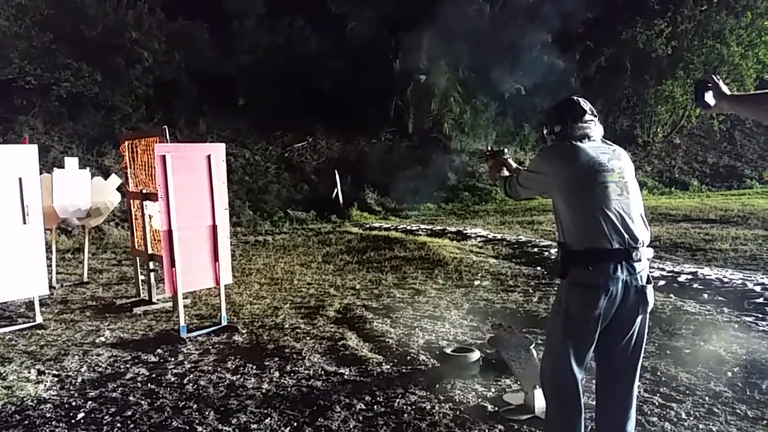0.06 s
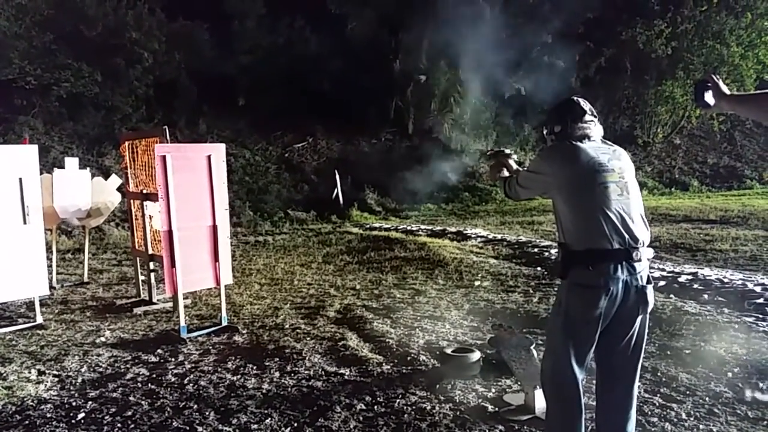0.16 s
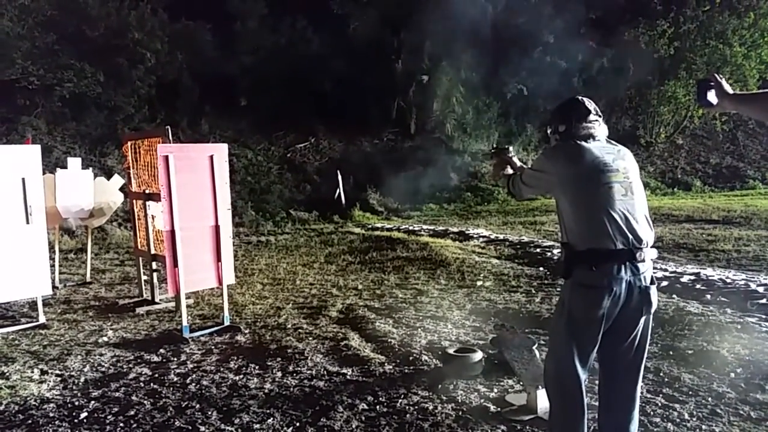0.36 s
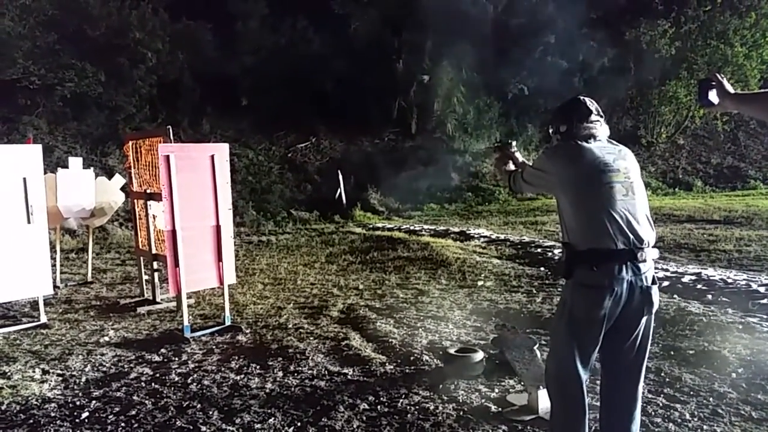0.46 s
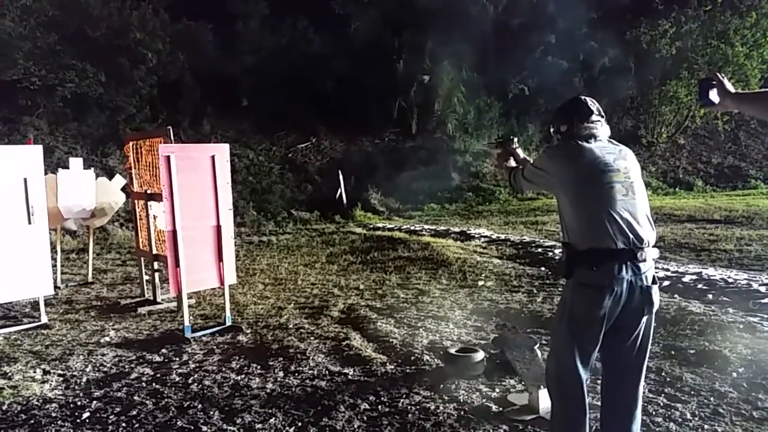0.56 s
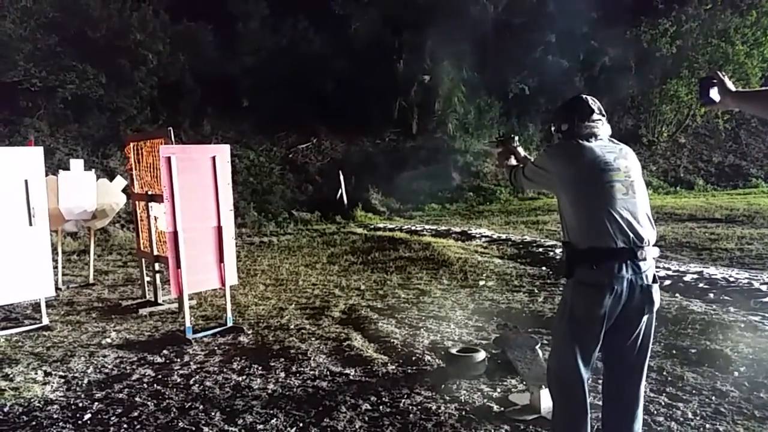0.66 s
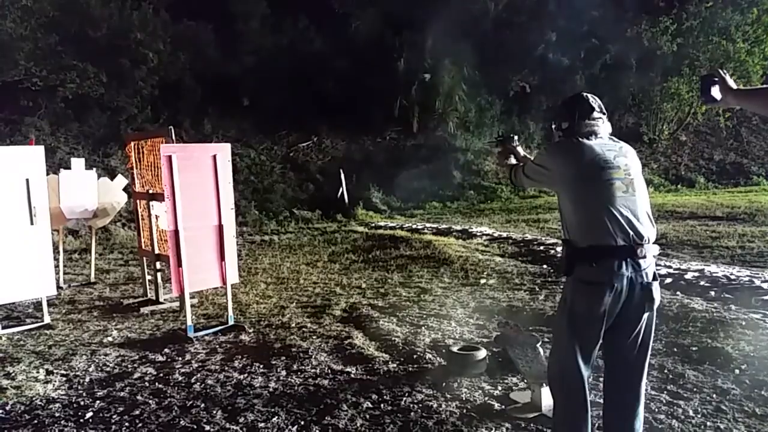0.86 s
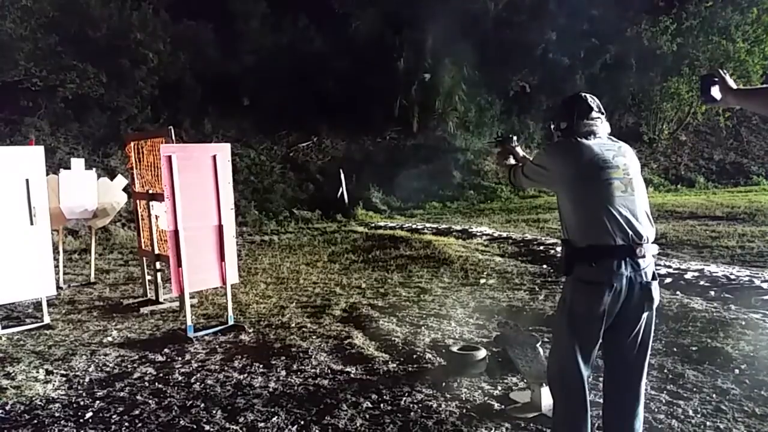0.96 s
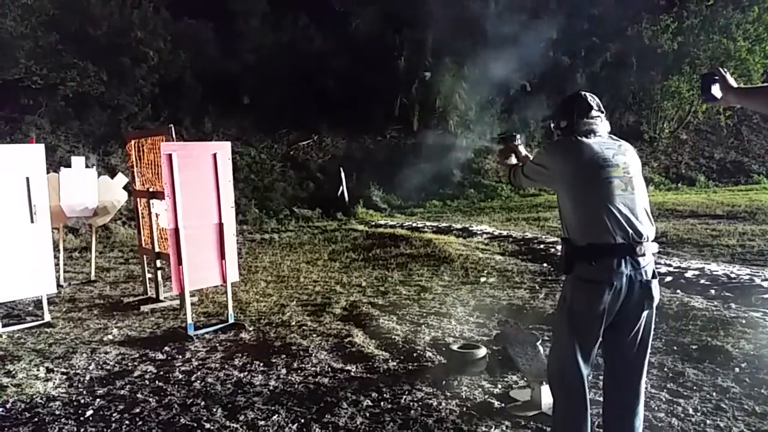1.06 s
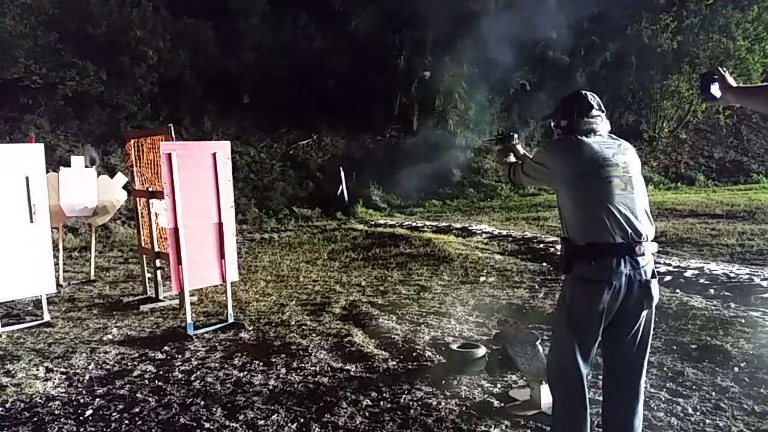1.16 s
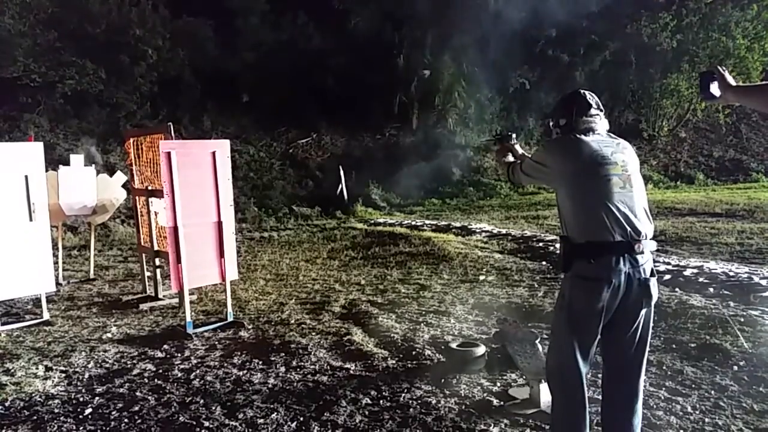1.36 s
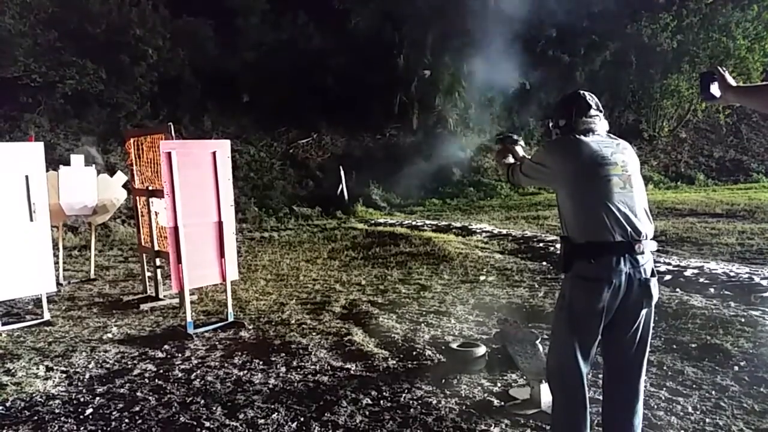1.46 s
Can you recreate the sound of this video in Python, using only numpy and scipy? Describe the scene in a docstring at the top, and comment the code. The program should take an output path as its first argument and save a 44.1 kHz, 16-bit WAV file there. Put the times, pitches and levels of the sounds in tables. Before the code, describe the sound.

A handgun fires two loud, clipped shots nearly a second apart outdoors, after the fading tail of an earlier shot. Quick slapback and a distant echo follow; close stereo microphones overload, brighter on the left.

```python
"""Handgun shots on an outdoor range

A handgun fires on an outdoor range; one shot fell just before the start, and its tail opens the scene.
Each blast, three noise bursts with a ring and a low thump, overloads two microphones. Shaped noise then
returns from nearby boards, the ground, an earth bank, the trees and a far wall with a long tail, with
short rings as slaps and clacks. Small metallic ticks, perhaps spent cases, ring as damped sines over
quiet air of coloured noise. The left side is bright, the right dull."""
import sys
import numpy as np
from scipy import signal
from scipy.fft import rfft, irfft
from scipy.io import wavfile
from scipy.ndimage import uniform_filter1d

SR = 44100
rng = np.random.default_rng(int(sys.argv[2]) if len(sys.argv) > 2 else 0)


def int16_out(signal):
    """Quantize to a 16-bit WAV file."""
    q = np.round(np.clip(np.atleast_2d(signal).T, -1, 1) * 32767)
    wavfile.write(sys.argv[1], SR, q.astype(np.int16))


N = 66150  # samples, 1.5 s

# spectra of the blast (NEAR), the reflecting surfaces and the long tail (FAR), named in the groups of
# noise: one [level/dB] per colour frequency
NEAR = (-13.5, 6, 7.6, 6.5, 10.3, 5, 6.7, 11.5, 11.5)
BOARDS = (-17, 3, -1.5, -2.7, 10.7, -5, 3.5, 4, 11.5)
GROUND = (-22, -5, -3, -3.5, 5, -4, 2, 8, 10)
BANK = (-10, -3, -3.5, -3.4, 3.1, -3.7, 6, 9.5, 14)
TREES = (-5, 2.3, 2.5, 1.5, 1.5, -5.5, -4.5, 6.5, 4.1)
WALL = (-4.5, 7, -3, -3, 5.8, -6.4, -8.3, 8.5, -1)
FAR = (2.1, 5.5, -15.5, -6.5, 8, -5.2, -4.5, -8, -12)


def gain_of(db):
    """Decibel law: amplitude ratio of a level in dB."""
    return 10 ** (np.asarray(db) / 20)


def read(points, hz):
    """Interpolation on a log-frequency axis, linear in the tabled value."""
    f, value = np.transpose(points)
    return np.interp(np.log(hz + 1), np.log(f + 1), value)


def add(mix, s, sound):
    """Superposition: sums a sound in at time s, which may lie before the start."""
    at = round(s * SR)
    part = mix[:, max(at, 0):][:, :max(sound.shape[1] + min(at, 0), 0)]
    part += sound[:, max(-at, 0):][:, :part.shape[1]]


def microphone_pair(colour, noise, tilt_db, alike):
    """Spectral filtering and interchannel coherence: colours two noises for two partly alike microphones."""
    # frequencies at which every colour is given [f/Hz]
    colour_hz = (60, 200, 520, 1200, 2300, 3500, 6500, 9500, 14000)
    # coherence of left and right, negative in antiphase: [f/Hz, likeness], scaled by alike below
    coherence = [(100, 1), (450, 0.79), (900, 0.51), (1450, -0.93), (2200, -0.043), (9000, .02)]
    # relative microphone responses: [f/Hz, level/dB]
    left_mic = [(40, -16), (90, -8.5), (180, -6.5), (330, -6.5), (520, -3), (800, 0.84), (1150, -0.37),
                (1500, -5.5), (2100, -3), (2800, -9), (3500, -1), (4400, -2.5), (5500, -4), (6900, -4.5),
                (7700, -11.5), (8400, -24), (9500, -36.5), (11500, -37.2), (13500, -40), (15700, -46)]
    right_mic = [(40, -21.5), (90, -9.5), (180, -7), (330, -9), (520, -10), (800, -5), (1150, -11),
                 (1500, -13), (2100, -18.5), (2800, -19.5), (3500, -16), (4400, -25), (5500, -24),
                 (6900, -29.6), (7700, -30), (8400, -32), (9500, -35), (11500, -34.5), (13500, -35),
                 (15700, -43.4)]

    n = noise.shape[1]
    hz = np.fft.rfftfreq(n, 1 / SR)
    first, second = rfft(noise)
    same = np.clip(alike * read(coherence, hz), -1, 1)
    right = same * first + np.sqrt(1 - same ** 2) * second
    tint = read(list(zip(colour_hz, colour)), hz)
    mics = gain_of([read(left_mic, hz) + tint, read(right_mic, hz) + tint])
    tilt = gain_of(tilt_db * np.log2(1 + hz / 2000))  # nears tilt_db per octave well above 2 kHz
    spectrum = np.array([first, right]) * mics * tilt
    return irfft(spectrum, n) / np.sqrt(np.mean(mics[0] ** 2))  # both sides scaled by the left response


def background_air():
    """Stationary random noise: a steady coloured floor, largely alike in the bass on both sides."""
    # spectrum of the air at the colour frequencies [level/dB]
    air_colour = (-6, 4, 2.7, 7.5, -16, 2, -11, -27.5, -19.5)
    return gain_of(-48) * microphone_pair(air_colour, rng.standard_normal((2, N)), 0, 0.86)


def lumpy_noise(lump_db):
    """Random superposition of dense arrivals, uneven in clumps a few milliseconds long."""
    clumps = uniform_filter1d(rng.standard_normal(SR), size=120)
    out = rng.standard_normal((2, SR)) * gain_of(lump_db * clumps / clumps.std())
    return out / out.std()


def shaped_group(sound, rise, hold, db, t60s):
    """Frequency-dependent decay: swells, holds, then dies exponentially at a rate set by band."""
    # bass, middle and treble points of the decay times [f/Hz]
    decay_hz = (200, 2000, 11000)
    frame, overlap = 256, 192  # samples
    hz, t, z = signal.stft(sound, SR, nperseg=frame, noverlap=overlap)
    t60 = read(list(zip(decay_hz, np.maximum(t60s, .01))), hz)[:, None]  # never under 10 ms
    z = z * gain_of(-60 * np.maximum(t - rise - hold, 0) / t60)
    out = signal.istft(z, SR, nperseg=frame, noverlap=overlap)[1][:, :SR]
    swell = np.sin(np.pi / 2 * np.minimum(np.arange(SR) / SR / max(rise, 1e-4), 1)) ** 2
    return gain_of(db) * swell * out


def add_blasts_and_reflections(mix, shots):
    """Impulsive source and delayed diffuse reflection: the blast's three bursts, then the same surfaces."""
    # groups of noise: [colour level/dB, delay t/s, rise t/s, hold t/s, level/dB, bass t60/s,
    #  middle t60/s, treble t60/s, lumpiness/dB, left-right likeness factor]; short t60 are floored in use
    groups = [(NEAR, .0001, 0.0012, 0.015, 8.74, 0.041, 0.06, 0.079, 3.3, 0.44),
              (NEAR, .0228, 0.0012, 0.006, 8.8, 0.057, 0.025, 0.035, 2.5, 0.44),
              (NEAR, .0355, 0.0022, 0.008, 4.6, 0.018, 0.017, 0.018, 1.3, .21),
              (BOARDS, .0405, 0.0025, 0.022, -6.5, 0.023, 0.0099, 0.0056, 1.1, 0.67),
              (GROUND, .056, 0.01, 0.019, -16.5, 0.28, 0.15, 0.28, 1.4, 0.53),
              (BANK, .088, 0.029, 0.018, -12, 0.37, 0.21, 0.19, 1.34, 0.84),
              (TREES, 0.12, 0.048, 0.12, -29.5, 0.49, .4, 0.41, 0.91, 0.99),
              (WALL, .3928, 0.00046, 0.0012, -29.5, 0.035, 0.007, .021, 1.1, .95),
              (WALL, 0.32, .0007, .0021, -38, .051, .021, 0.027, 0.96, 0.64),
              (WALL, .396, 0.0058, 0.032, -36.5, 0.17, 0.11, 0.18, 3, 1),
              (FAR, 0.37, 0.049, 0.041, -33.5, 2.23, 1.88, 1, 1.2, 1)]
    common = 0.59  # amplitude share of the noise that every shot has in common
    close_s = .07  # s, groups with a shorter delay take the shot's close level and tilt

    lasting = [lumpy_noise(row[-2]) for row in groups]
    for s, shot_db, close_db, tilt_db in shots:
        for kept, (colour, delay, rise, hold, db, *t60s, lump_db, alike) in zip(lasting, groups):
            fresh = lumpy_noise(lump_db)
            noise = common * kept + np.sqrt(1 - common ** 2) * fresh
            close = delay < close_s
            sound = microphone_pair(colour, noise, close * tilt_db, alike)
            level_db = db + shot_db + close * close_db
            add(mix, s + delay, shaped_group(sound, rise, hold, level_db, t60s))


def damped_ring(left_db, right_db, hz, t60):
    """Damped oscillation: a decaying sine that swells over two cycles, scaled to its peak."""
    t = np.arange(4000) / SR
    swell = np.sin(np.pi / 2 * np.minimum(t * hz / 2, 1)) ** 2
    ring = np.sin(2 * np.pi * hz * t) * gain_of(-60 * t / t60) * swell
    return gain_of([[left_db], [right_db]]) * ring / abs(ring).max()


def add_short_rings(mix, shots):
    """Damped modes: a ring and a low thump within each blast, then slaps and clacks after it."""
    # short rings: [delay t/s, left level/dB, right level/dB, ring f/Hz, t60/s]; the shot level is added
    rings = [(.004, 3.5, -1.5, 621, 0.066), (0.014, -25.5, -24, 50, 0.056),
             (.022, -13.5, -11, 110.6, 0.045), (.0385, -6.5, -16.5, 170, 0.011),
             (.126, -16.5, -23.5, 1465, 0.017), (.3932, -17, -43, 2000, 0.011),
             (0.392, -28, -52, 7620, 0.016), (0.4017, -27, -57, 7600, 0.012), (.4135, -19, -44, 1970, .018),
             (0.434, -41, -40.5, 149, 0.033), (.461, -32, -33, 190, 0.0115),
             (.4095, -21, -45.1, 2270, 0.029)]
    for s, shot_db, _, _ in shots:
        for delay, *ring in rings:
            add(mix, s + delay, gain_of(shot_db) * damped_ring(*ring))


def add_ticks(mix):
    """Modal ringing of small metal: one damped mode for each tick, perhaps a spent case."""
    # ticks: [t/s, left level/dB, right level/dB, ring f/Hz, t60/s]
    ticks = [(.7485, -24.5, -53, 3450, 0.0096), (1.1782, -3.5, -32, 6560, 0.0088)]
    for s, *ring in ticks:
        add(mix, s, damped_ring(*ring))


def scene():
    """Linear superposition of quiet air, three shots with their reflections and short rings, and ticks."""
    # shots: [t/s, level/dB, extra level of the close groups/dB, their treble tilt/dB per octave]
    shots = [(-.2685, -2.14, -5, -2), (.2303, -1.17, -3.04, 1.36), (1.0831, -1.57, -2.5, -0.8)]
    mix = background_air()
    add_blasts_and_reflections(mix, shots)
    add_short_rings(mix, shots)
    add_ticks(mix)
    return mix


def record(dry):
    """Dynamic compression and saturation: each side is turned down, its peaks overload, then a band limit."""
    limit_db, squeeze = -7.5, 0.62  # threshold in dB, dB of cut per dB above it
    sense_s, fall_db_per_s = 0.00077, 898.5  # power averaging time, fall of the sensed level
    knee = 3.8  # exponent of the soft clip at full scale
    edge_hz = 15850

    power = abs(uniform_filter1d(dry ** 2, max(round(sense_s * SR), 1)))
    power_db = 10 * np.log10(power + 1e-12)
    fall = np.arange(N) * fall_db_per_s / SR
    sensed_db = np.maximum.accumulate(power_db + fall, axis=1) - fall  # instant rise, steady fall
    over_db = np.maximum(sensed_db - limit_db, 0)
    held = dry / gain_of(squeeze * uniform_filter1d(over_db, size=30))
    clipped = held / (1 + abs(held) ** knee) ** (1 / knee)
    lowpass = signal.firwin(511, edge_hz, window=("kaiser", 9), fs=SR)
    return signal.oaconvolve(clipped, lowpass[None], "same")


dry = scene()
out = record(dry)
int16_out(out)
```